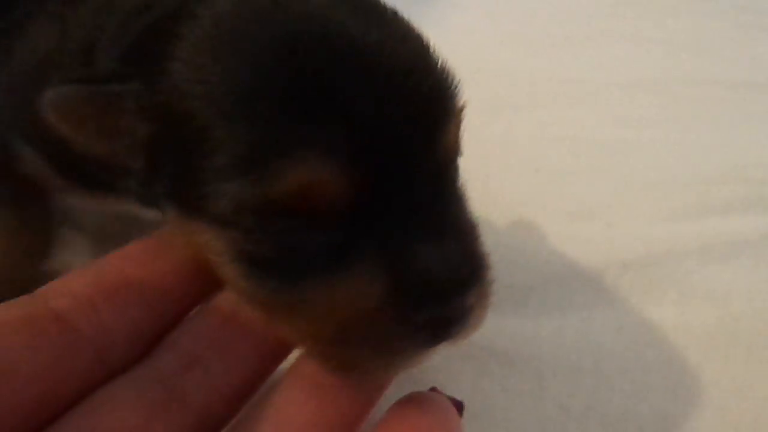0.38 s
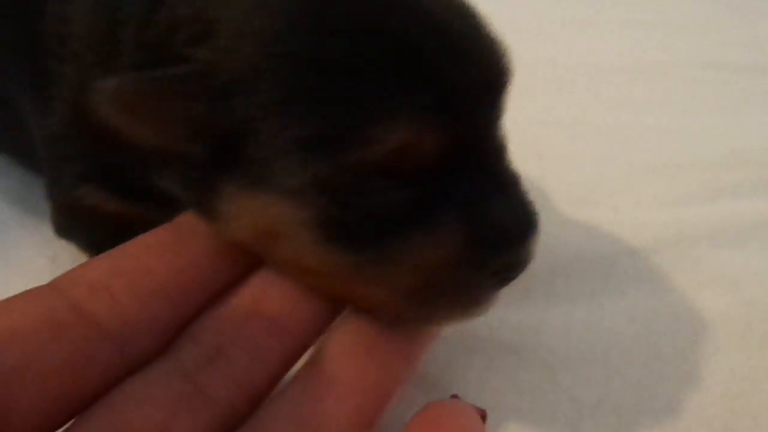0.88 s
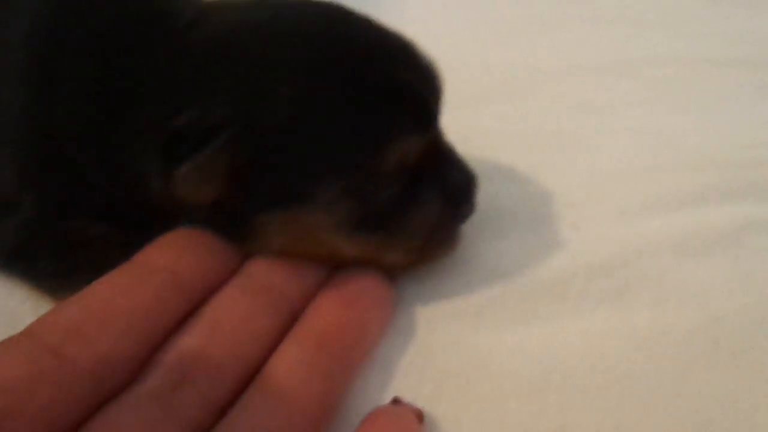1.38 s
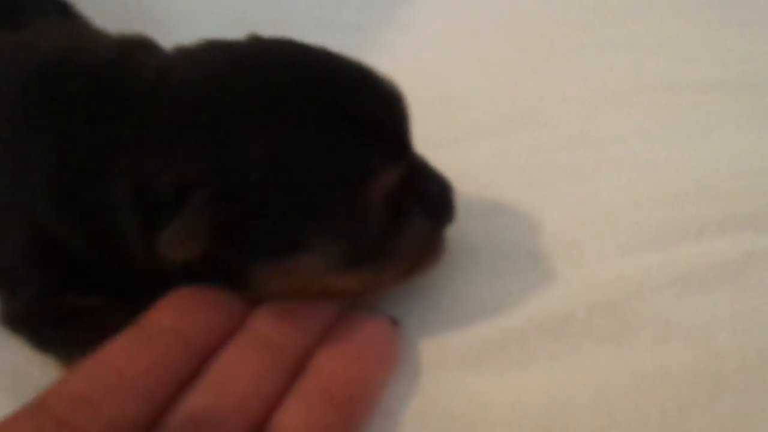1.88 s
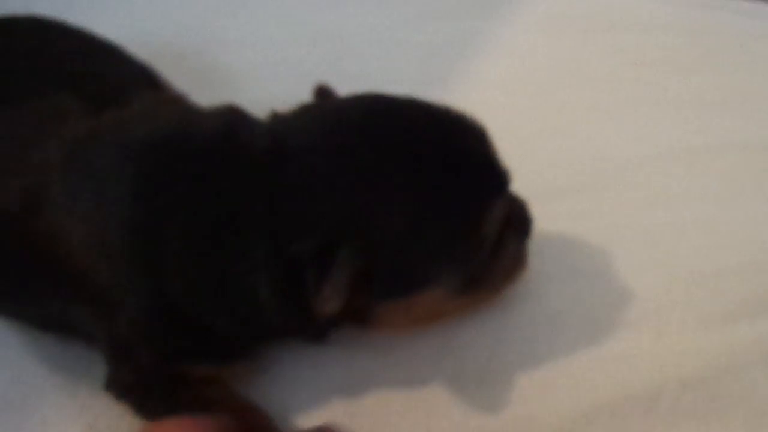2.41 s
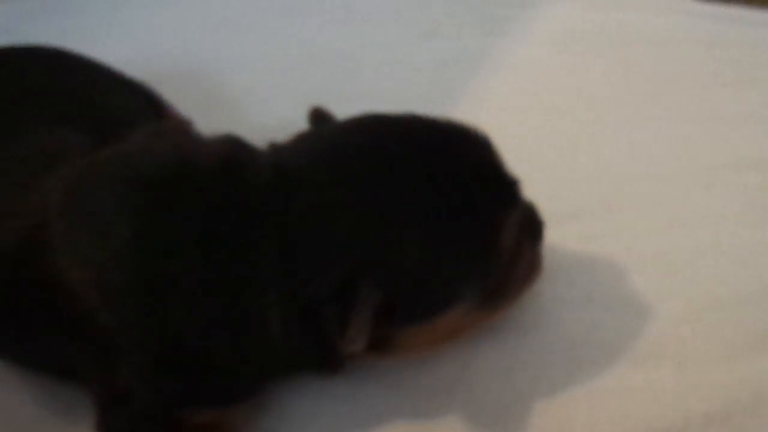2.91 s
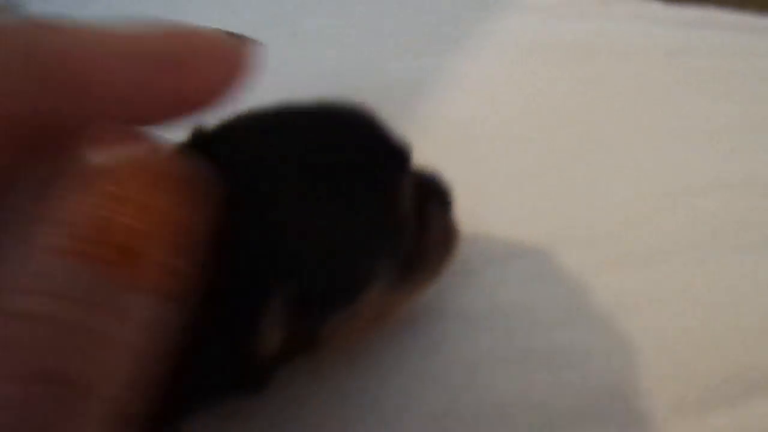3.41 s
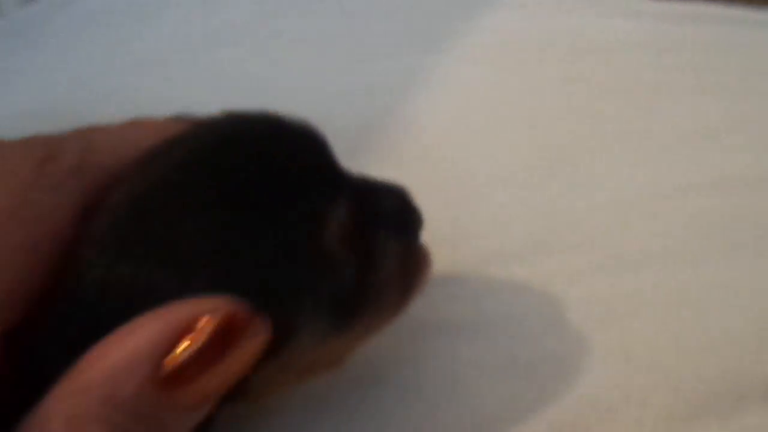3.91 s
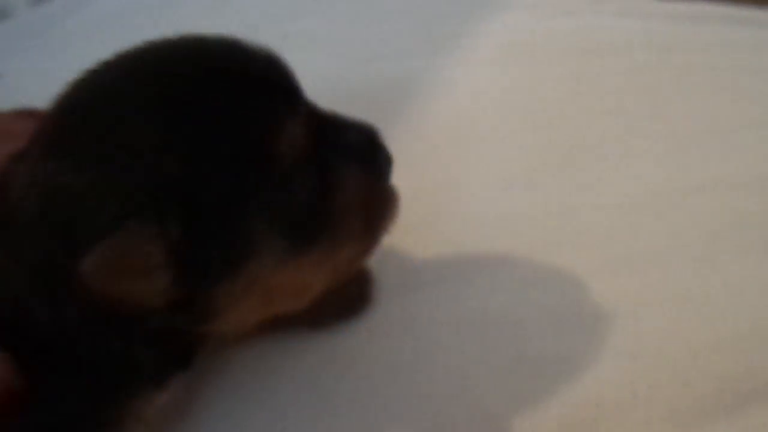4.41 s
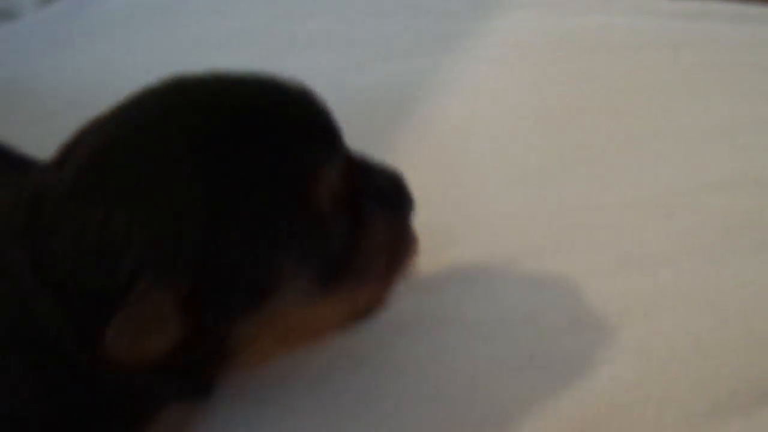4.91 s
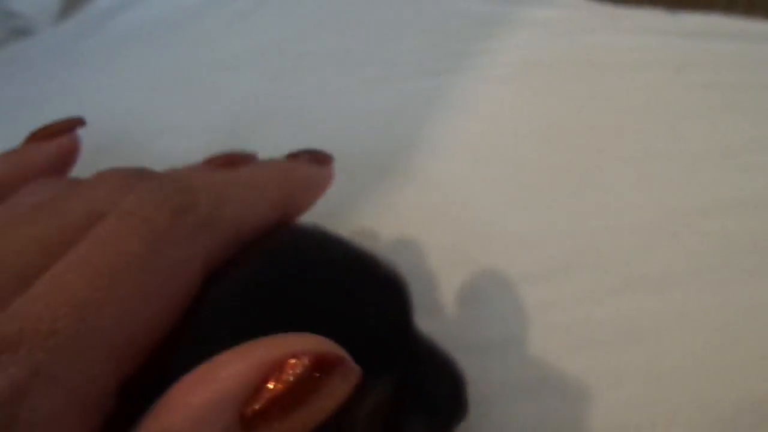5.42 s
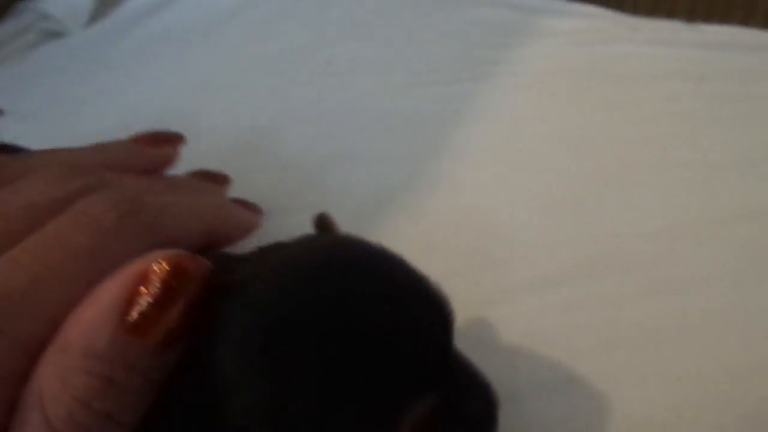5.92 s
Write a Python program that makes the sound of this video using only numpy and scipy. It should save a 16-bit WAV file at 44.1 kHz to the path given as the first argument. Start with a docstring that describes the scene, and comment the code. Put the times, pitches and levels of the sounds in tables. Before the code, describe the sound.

Close view of a tiny puppy fussing on bedding: high squeaks crack into low, pulsing creaks, each well under half a second. The first is the loudest and highest, the middle ones weaker and grainier, and a last strong whimper comes near the end. Small mouth clicks, breathy sniffs and a rustly snuffle lie between. Soft thuds repeat far off; dry indoor air, constant hiss and a very thin electronic whine.

```python
"""A quiet room, a bed close to the microphone: a newborn puppy whimpers in squeaks that break into creaky pulses.
The voice is a train of uneven fold pulses through a shut and an open mouth, with a faint, dull room tail.
Shaped noise makes the nose air and low puffs of breath, dense grains the snuffles, ringing snaps the lip clicks.
Further off, dull thuds fall about every 0.6 s as dying bands of noise.
Steady coloured hiss and a thin, sign-flipping whine lie below."""
import sys
import numpy as np
from scipy import signal
from scipy.fft import rfft, irfft
from scipy.io import wavfile
from scipy.ndimage import uniform_filter1d

SR = 44100
rng = np.random.default_rng(int(sys.argv[2]) if len(sys.argv) > 2 else 0)


def voltage_ratio(level):
    """Linear amplitude factor for a level in decibels (scalar or array-like)."""
    return 10 ** (np.asarray(level, float) / 20)


def wrap_up_sound(samples):
    """Save the sound to the file named by the first command line argument, as 16-bit audio."""
    columns = np.atleast_2d(samples).T
    # keep every value between -1 and 1, then stretch to whole-number steps
    tamed = np.clip(columns, -1, 1)
    steps = np.round(tamed * 32767).astype(np.int16)
    wavfile.write(sys.argv[1], SR, steps)


N = 266917  # samples

# colour of the room hiss: (frequency [Hz], level per Hz [dB])
ROOM_COLOUR = [(15, -45), (25, -13.5), (64, -13), (109, -4.5), (242, -4.5), (460, -3.5), (511, -3.5),
               (763, -1.5), (896, -2), (1110, -4), (1370, -3.5), (1610, -6), (10700, -14), (12000, -12),
               (14800, -12.5)]
ROOM_DB = -57.5
# thin electronic whine: (tone [Hz], rate of the full sign cycle, two flips each [Hz])
WHINE = (12272.7, 14.985)

# lip clicks: (time [s], peak [dB], ring [Hz], bright edge [dB])
CLICKS = [(0.211, -37, 1560, -13), (1.029, -40, 1230, -16), (1.088, -48, 834, -16), (1.258, -37, 1120, -13),
          (1.905, -44, 860, -21), (1.929, -39, 1250, -23), (2.404, -38, 745, -21),
          (2.436, -42.5, 1460, -18), (2.794, -38, 770, -20), (3.151, -46, 1250, 7), (4.56, -50, 826, -16),
          (5.435, -37.5, 760, -26), (5.454, -42, 1200, -19), (5.751, -31, 769, -4)]

FADE_DB = 20  # depth reached after one rise or release time
# air hissing through the nostrils: (time [s], rise [s], hold [s], level [dB])
NOSE_AIR = [(.38, .06, .022, -65), (0.666, 0.035, .012, -62), (1.25, .022, 0.011, -71),
            (1.33, 0.12, .19, -60), (1.98, .08, .086, -65), (2.48, .04, 0.15, -72.5),
            (3.3, 0.12, .17, -67.5), (3.704, 0.13, 0.091, -55.5), (5.13, .052, .008, -60.5),
            (5.452, 0.11, 0.19, -59.5)]
AIR_SAG_DB_PER_S, AIR_RELEASE_S = 8, .04
# nostril resonances: (frequency [Hz], width [Hz], level [dB])
NOSE_RESONANCES = [(9860, 990, 12), (11450, 1800, 4.5), (14000, 3100, 1.5)]
# one whistle in the nose, level before its wobble: (time [s], rise [s], hold [s], level [dB])
NOSE_WHISTLE = (3.464, .006, .025, -60)
WHISTLE_START_HZ, WHISTLE_SAG_HZ_PER_S, WHISTLE_RELEASE_S = 6080, 1200, .14

# snuffles in the sheet: (time [s], rise [s], hold [s], level of the low part [dB], treble against it [dB])
SNUFFLES = [(.42, .006, .06, -61, -4), (2.793, .004, .136, -48, -4), (3.147, 0.0039, 0.032, -42.5, -1.5),
            (3.165, 0.026, 0.019, -38, -2.5), (3.21, 0.023, 0.12, -44.5, -2.5),
            (3.483, 0.0073, 0.018, -53.5, 1.5), (3.524, 0.018, 0.11, -63, 5),
            (4.523, .004, .012, -51, -1.5)]
SNUFFLE_SAG_DB_PER_S, SNUFFLE_RELEASE_S = 70, .027
# nasal low part of a snuffle: (frequency [Hz], width [Hz], level [dB])
SNUFFLE_RESONANCES = [(900, 230, -1), (1680, 2720, -7.5)]

# one entry a cry: (mouth opening at rest [0-1], added gape on high notes [0-1], basic fold slackness [0-1]),
# then rows of (time [s], vocal fold rate [Hz], level [dB], roughness before a small cut [0-1])
CRIES = [ ((0.33, 0.58, .14), [(.51, 1000, -39.5, 0.01), (.536, 1112, -37, 0.14), (.539, 1209, -24, 0.08),
         (.56, 1368, -22.5, 0.06), (.577, 1445, -23, 0.06), (.59, 1475, -27, 0.01),
         (.607, 1364, -27.5, 0.06), (.625, 1258, -31.5, 0.06), (.641, 1028, -36, 0), (.657, 669, -36, 0.04),
         (.665, 616, -36.5, 0.08), (.678, 640, -35.5, 0.04), (.697, 563, -30.5, 0.02),
         (.705, 540, -31.5, 0.41), (.721, 496.4, -37, 0.35), (.737, 390, -36, 0.14), (.753, 460, -39, .55),
         (.785, 330.5, -41, .28), (.801, 295.6, -40, .22), (.811, 288, -53, 0)]), ((.1, 0, .15),
         [(.859, 790, -50.5, 0.67), (.866, 850, -41, 0.43), (.873, 900, -52, .55)]), ((0.33, .1, 0),
         [(.981, 1104, -51, 0.03), (.995, 1180, -58, .25), (1.024, 1165, -54, 0.07)]), ((0.26, 0.27, 0.017),
         [(1.262, 605, -45, 0.28), (1.271, 571, -35.5, 0), (1.283, 538, -33.5, 0.06),
         (1.292, 620, -36.5, 0.08), (1.303, 766, -28, 0), (1.319, 788, -28.5, .03), (1.343, 933, -31, 0.07),
         (1.361, 1022, -32.5, 0.05), (1.375, 959.4, -32, 0.09), (1.394, 698, -31.5, 0.05),
         (1.409, 715, -28.5, 0.1), (1.423, 555, -25.5, 0.15), (1.433, 500, -30, 0.42),
         (1.471, 680, -26.5, 0.71), (1.492, 441.7, -32, 0.33), (1.502, 780, -27.5, 0.61),
         (1.53, 594, -32.5, .7), (1.545, 551, -27.5, .5), (1.57, 652, -32, .7), (1.605, 452, -35.5, .62),
         (1.625, 406, -41.5, .5)]), ((0.22, .1, 0.19), [(1.938, 1902, -53, 0.01),
         (1.949, 1319, -39.5, 0.04), (1.953, 669.4, -42, 0.39), (1.966, 403.3, -43, .45),
         (1.984, 699, -34, 0.63), (1.992, 595.4, -40, 0.61), (2.0, 1800, -54, 0.01),
         (2.005, 1250, -34, .12), (2.01, 423, -43, .11), (2.022, 445, -36.5, 0.2),
         (2.047, 620, -33.5, 0.76), (2.06, 700, -34.5, 0.59), (2.074, 428, -33.5, .27),
         (2.091, 500, -32.5, .5), (2.112, 500, -35.5, 0.69), (2.127, 570, -44, .2)]), ((0.23, .1, 0.24),
         [(2.449, 406.6, -53, 0.58), (2.464, 580, -43, 0.28), (2.484, 405.2, -38, 0.72),
         (2.5, 398, -55, .7), (2.514, 388, -42, 0.59), (2.552, 590.4, -41.5, 0.73), (2.572, 606, -35.5, .6),
         (2.58, 373, -38.5, 0.17), (2.592, 325, -38.5, 0.03), (2.606, 346, -38.5, 0),
         (2.611, 630, -43, 0.2), (2.62, 614, -55, 0.3)]), ((0.33, .1, .4), [(2.96, 500, -45.5, .5),
         (2.975, 403.6, -48.5, 0.47), (2.99, 398, -49, 0.62), (3.003, 318, -38.5, 0.36),
         (3.019, 399.7, -42.5, 0.52), (3.052, 405, -38, 0.49), (3.058, 600, -41.5, 0.17),
         (3.064, 607, -46, 0.08)]), ((0.4, .1, 0.57), [(3.332, 664, -50, 0.48), (3.346, 639, -40.5, 0.23),
         (3.36, 666, -34, 0.04), (3.376, 611, -39.5, 0), (3.38, 402, -39, 0.58), (3.4, 480, -37, 0.67),
         (3.417, 433, -34.5, 0.23), (3.426, 423, -35.5, .08), (3.442, 349, -37, 0.02),
         (3.455, 301, -43, .4), (3.464, 334, -37.5, 0.47), (3.472, 420, -42.5, 0.33),
         (3.481, 604, -42, .2)]), ((0.22, .1, 0.26), [(3.704, 536.2, -44.5, 0.21),
         (3.732, 521.4, -38, 0.73), (3.748, 481.4, -35, 0.26), (3.79, 576, -35, 0.59),
         (3.804, 461, -39, 0.54), (3.82, 566.4, -32, 0.51), (3.86, 545, -35, 0.58), (3.878, 686, -33, 0.64),
         (3.886, 600, -39.5, 0.58), (3.898, 500, -45, 0.33)]), ((.1, 0, .1), [(4.472, 1153, -54, 0.32),
         (4.49, 1250, -61.5, 0.43), (4.53, 1150, -53.5, 0.28), (4.55, 1100, -57, 0.26)]), ((.1, 0, .1),
         [(4.81, 1300, -63, .3), (4.845, 1300, -59, 0.18), (4.857, 1280, -59, 0.16)]), ((0.12, .1, 0.13),
         [(5.088, 1150, -53, .3), (5.104, 950, -50, 0.28), (5.124, 500, -51, 0.81), (5.17, 679, -44.5, .65),
         (5.182, 500, -62, .6)]), ((.14, 0.45, .07), [(5.462, 276, -46, 0.39), (5.472, 415, -39.5, 0.18),
         (5.492, 656.4, -30.5, 0.09), (5.503, 638, -28.5, 0.09), (5.524, 687, -28.5, 0.04),
         (5.534, 738.5, -26, 0.09), (5.547, 665.4, -25.5, 0.05), (5.553, 427.6, -31, 0.27),
         (5.57, 376, -26.5, 0.02), (5.582, 370.3, -29, 0.17), (5.592, 620, -25.5, 0.57),
         (5.604, 620, -31.5, 0.64), (5.624, 601.6, -30, 0.62), (5.657, 620, -30, 0.84),
         (5.716, 620, -32.5, 0.66), (5.73, 620, -35, .65), (5.742, 620, -45, 0.63)]), ((0.17, 0, 0.076),
         [(6.013, 129.5, -47.5, 0.16), (6.036, 500, -60, 0.74), (6.052, 620, -41.5, 0.68)]), ]
# moments in another, steady register: (time [s], length [s], rate [Hz], level at mid-flip [dB])
FLIPS = [(1.967, .01, 1300, -47), (2.024, .019, 1219, -28.5), (2.062, .009, 1250, -27),
         (2.47, .01, 1111, -40), (2.502, .009, 1800, -55), (2.535, .013, 1119, -36),
         (2.566, .004, 1153, -34), (3.035, .011, 1090, -46.5), (3.406, .007, 1090, -48),
         (3.825, .012, 1153, -28.5), (5.505, .011, 309, -29), (5.632, .013, 508, -29)]
FLIP_ROUGHNESS, FLIP_GAPE, FLIP_SLACK = .074, .03, .25
FLIP_EDGE_DB = -3.5  # a flip swells and shrinks again
# the voice catches: (time [s], length [s])
CATCHES = [(1.977, .004), (1.991, .007), (2.093, .003), (2.12, .004), (2.478, .004), (2.509, .004),
           (2.56, .003), (3.412, .003), (3.455, .005), (3.477, .004), (3.727, .003), (3.792, .003),
           (5.719, .005)]
CATCH_DB = -21.5
GAPE_FROM_HZ, GAPE_FULL_HZ = 590, 1150  # the mouth opens as the pitch climbs
CLOSING_S, CLOSING_SLACK = .024, .41  # the folds go limp as a cry ends
# folds slacken when faint, and close softly on high notes
SLACK_PER_DB, SLACK_BELOW_DB, SLACK_ON_TOP = .1, -34, .33
# throat resonances, mouth shut: (frequency [Hz], width [Hz], level [dB])
SHUT_MOUTH = [(620, 477, -2), (1300, 414, 7.5), (1824, 250, 3.5), (2868, 370, -4), (3415, 570, -12.5)]
# throat resonances, mouth open: (frequency [Hz], width [Hz], level [dB])
OPEN_MOUTH = [(1100, 530, 0.02), (2420, 884, 0.0063), (2864, 408, 1.44)]
# overtones let out by the wide open mouth: (frequency [Hz], width [Hz], level [dB])
HIGH_OVERTONES = [(5830, 1900, -43.5), (10200, 1000, -40), (13800, 2200, -43)]
NASAL_DIP_HZ = 2200
BEDROOM_T60_S, BEDROOM_DB = .35, -27

# low puffs of breath on the microphone: (time [s], rise [s], hold [s], level [dB])
PUFFS = [(1.47, 0.06, .09, -67), (1.7, 0.086, 0.021, -72), (3.766, 0.054, .01, -70),
         (5.78, 0.049, .04, -66), (5.92, .048, .01, -78)]
PUFF_SAG_DB_PER_S, PUFF_RELEASE_S = 10, .09

# far thuds: (time [s], level [dB], boom below 150 Hz [dB], knock above 400 Hz [dB])
THUDS = [(2.715, -43, -1, -3.5), (3.177, -48.5, 3.5, 10), (3.92, -49.5, -1.5, 5.5), (4.525, -51, 1, 2.5),
         (5.137, -49, -4, 0.5), (5.746, -45, 1.5, 3.5)]
# how the thuds die away: (band centre [Hz], level [dB], decay by 60 dB [s])
THUD_BANDS = [(106, -11.5, 0.69), (221, -5.5, 0.69), (500, -12.5, 1), (1000, -14, 0.66),
              (1800, -16.5, 0.98)]
OFFSET = -.00055  # constant shift of the waveform [full scale]


def rms_one(x):
    """Scales to unit power."""
    return x / np.sqrt(np.mean(x ** 2) + 1e-20)


def band(x, low_hz, high_hz, order=2):
    """Butterworth band-pass."""
    edges = [low_hz, min(high_hz, .45 * SR)]
    return signal.sosfilt(signal.butter(order, edges, "band", fs=SR, output="sos"), x)


def resonate(x, modes):
    """Parallel resonances, signs alternating."""
    out = 0
    for k, (hz, width_hz, db) in enumerate(modes):
        radius = np.exp(-np.pi * width_hz / SR)
        b = np.array([1, 0, -1]) * (1 - radius * radius) / 2
        a = [1, -2 * radius * np.cos(2 * np.pi * hz / SR), radius * radius]
        out = out + (-1) ** k * voltage_ratio(db) * signal.lfilter(b, a, x + 1e-18)
    return out


def pulses(times, sizes):
    """Band-limited clicks that may fall between samples."""
    at = np.asarray(times) * SR
    index = at.astype(int)[:, None] + np.arange(-7, 9)
    lag = index - at[:, None]
    click = np.sinc(.8 * lag) * np.cos(np.pi * lag / 16) ** 2
    out = np.zeros(N + 4000)
    np.add.at(out, index, np.asarray(sizes)[:, None] * click)
    return out[:N]


def swell(s, rise_s, hold_s, db, sag_db_per_s, release_s):
    """Gain that rises, holds while sagging, then lets go."""
    since = np.arange(N) / SR - s - rise_s
    edge = np.maximum(-since / rise_s, (since - hold_s) / release_s).clip(0)
    fall_db = FADE_DB * edge + sag_db_per_s * since.clip(0)
    return voltage_ratio(db - np.minimum(fall_db, 150)) * (since > -rise_s)


def room_hiss():
    """Steady noise with the colour of room and preamplifier together."""
    hz = np.arange(N // 2 + 1) * SR / N + 1
    colour_hz, colour_db = np.transpose(ROOM_COLOUR)
    colour = voltage_ratio(np.interp(np.log(hz), np.log(colour_hz), colour_db))
    return voltage_ratio(ROOM_DB) * rms_one(irfft(rfft(rng.standard_normal(N)) * colour, N))


def whine(db, first_flip_s):
    """A thin tone from the electronics that changes sign thirty times a second."""
    t = np.arange(N) / SR
    hz, flips_hz = WHINE
    sign = np.tanh(5.4 * np.sin(2 * np.pi * flips_hz * (t - first_flip_s)))
    return np.sqrt(2) * voltage_ratio(db) * sign * np.sin(2 * np.pi * hz * t)


def clicks():
    """Wet lips part: a snap that rings for a cycle or two."""
    out = 0
    for s, db, hz, edge_db in CLICKS:
        pop = pulses([s], [1])
        ring = resonate(resonate(pop, [(hz, 1100, 0)]), [(hz, 1100, 0)])
        edge = band(resonate(pop, [(2870, 1000, edge_db)]), 1600, 3700)
        snap = ring + edge
        out = out + voltage_ratio(db) * snap / np.abs(snap).max()
    return out


def nose_air(voice, flutter):
    """Turbulent air, throbbing a little with the voice, and one short whistle."""
    level = sum(swell(*row, AIR_SAG_DB_PER_S, AIR_RELEASE_S) for row in NOSE_AIR)
    throb = np.abs(voice) / np.sqrt(uniform_filter1d(voice ** 2, size=900).clip(0) + 1e-6)
    hiss = rms_one(resonate(rng.standard_normal(N), NOSE_RESONANCES))
    hiss = hiss * (1 + flutter * uniform_filter1d(throb, size=40))
    since = np.arange(N) / SR - NOSE_WHISTLE[0]
    wobble = .64 + .54 * rms_one(band(rng.standard_normal(N), 24, 200))
    # halving the sag in the phase makes the pitch fall at the full rate
    turns = (WHISTLE_START_HZ - WHISTLE_SAG_HZ_PER_S * since / 2) * since
    whistle = np.sqrt(2) * wobble * np.sin(2 * np.pi * turns)
    return level * hiss + swell(*NOSE_WHISTLE, 0, WHISTLE_RELEASE_S) * whistle


def snuffles(grains_per_s, spread_db):
    """Dense uneven grains of air and cloth: a nasal low part and a broad hiss."""
    falls = rng.random(N) < grains_per_s / SR
    sizes = voltage_ratio(spread_db * np.minimum(rng.exponential(1, N), 4))
    grains = falls * sizes * rng.choice([-1, 1], N)
    low = rms_one(resonate(grains, SNUFFLE_RESONANCES))
    treble = rms_one(band(grains, 1750, 5800, order=1))
    out = 0
    for *row, treble_db in SNUFFLES:
        gain = swell(*row, SNUFFLE_SAG_DB_PER_S, SNUFFLE_RELEASE_S)
        out = out + gain * (low + voltage_ratio(treble_db) * treble)
    return out


def folds_at(t, cry):
    """Rate, level, roughness, mouth opening and slackness of one cry at one moment."""
    (rest, gape, slack), table = cry
    s, *columns = np.transpose(table)
    hz, db, rough = (np.interp(t, s, column) for column in columns)
    slack = slack + SLACK_PER_DB * max(SLACK_BELOW_DB - db, 0)
    slack = slack + CLOSING_SLACK * np.exp((t - s[-1]) / CLOSING_S)
    for start, length, flip_hz, flip_db in FLIPS:
        if start <= t < start + length:
            hz = flip_hz
            db = flip_db + FLIP_EDGE_DB * (2 * (t - start) / length - 1) ** 2
            rough, gape, slack = FLIP_ROUGHNESS, FLIP_GAPE, FLIP_SLACK
    db += CATCH_DB * any(start <= t < start + length for start, length in CATCHES)
    high = np.clip((hz - GAPE_FROM_HZ) / (GAPE_FULL_HZ - GAPE_FROM_HZ), 0, 1)
    return hz, db, np.clip(rough - .05, 0, 1), rest + gape * high, slack + SLACK_ON_TOP * high


def throat(times, sizes, opening, slack, turbulence):
    """Each pulse is shared between the shut and the open mouth; slack folds close softly and sound dull."""
    air = rng.standard_normal(N)

    def gusts(share):
        """A short burst of rushing air follows every rough pulse."""
        return air * signal.lfilter([1], [1, -.985], pulses(times, sizes * share * turbulence))

    def folds(share):
        """Firm closures, dull soft closures and gusts of one share of the pulses."""
        firm = pulses(times, sizes * share * (1 - slack))
        soft = band(pulses(times, sizes * share * slack), 87, 884)
        return firm + 1.94 * soft + gusts(share * (1 - slack))

    nasal_dip = signal.iirnotch(NASAL_DIP_HZ, 3.0, fs=SR)
    shut = signal.lfilter(*nasal_dip, resonate(folds(1 - opening), SHUT_MOUTH))
    shut = band(band(shut, 250, 6000), 120, 3850, order=3)
    wide = band(resonate(folds(opening), OPEN_MOUTH), 570, 4080, order=3)
    rasp = band(gusts(1 - slack), 3500, 4600, order=4)
    # the cube favours the wide open mouth
    bright = band(pulses(times, sizes * opening ** 3), 5000, 15000)
    return shut + wide + voltage_ratio(-17.5) * rasp + resonate(bright, HIGH_OVERTONES)


def cries(jitter, memory, shimmer_db, breathy):
    """The folds close cycle after cycle; roughness makes the cycles uneven in length and strength."""
    rows = []
    for cry in CRIES:
        table = cry[1]
        t, end = table[0][0], min(table[-1][0], N / SR)
        lengths, strengths = rng.standard_normal((500, 2)).T
        # a long cycle tends to follow a long one
        lengths = signal.lfilter([np.sqrt(1 - memory ** 2)], [1, -memory], lengths)
        for length, strength in zip(lengths, strengths):
            if t > end:
                break
            hz, db, rough, opening, slack = folds_at(t, cry)
            pulse_db = db + shimmer_db * rough * np.clip(strength, -2, .5)
            rows.append((t, pulse_db, opening, slack, breathy * rough))
            t += np.exp(np.clip(jitter * rough * length, -1, .7)) / hz
    times, db, *shape = np.transpose(rows)
    shape = np.clip(shape, 0, 1)
    # the effort sets the loudness whatever the pitch: equal pulses show what the throat adds
    even = throat(times, np.ones_like(times), *shape)
    power = uniform_filter1d(uniform_filter1d(even ** 2, size=200), size=200)
    loudness = np.sqrt(power.clip(0) + 1e-9)
    near = np.minimum((times * SR).astype(int) + 40, N - 1)
    return throat(times, voltage_ratio(db) / loudness[near], *shape)


def bedroom(x):
    """Soft furnishings return a faint, dull tail."""
    t = np.arange(SR // 2) / SR
    noise = band(rng.standard_normal(len(t)), 480, 2400)
    tail = noise * voltage_ratio(-60 * t / BEDROOM_T60_S) * (t > .004)
    return voltage_ratio(BEDROOM_DB) * signal.fftconvolve(x, tail / np.sqrt(np.sum(tail ** 2)))[:N]


def puffs():
    """The puppy's breath pushes slow, low puffs of air against the microphone."""
    level = sum(swell(*row, PUFF_SAG_DB_PER_S, PUFF_RELEASE_S) for row in PUFFS)
    return level * rms_one(band(rng.standard_normal(N), 30, 146))


def thuds():
    """Each thud reaches us as the room's tail, dying band by band."""
    out, t = np.zeros(N), np.arange(N) / SR
    for hz, band_db, t60 in THUD_BANDS:
        level = 0
        for s, db, boom_db, knock_db in THUDS:
            since = np.clip(t - s, 0, None)
            colour_db = boom_db * (hz < 150) + knock_db * (hz > 400)
            onset = 1 - np.exp(-since / .0011)
            level = level + voltage_ratio(db + colour_db - 60 * since / t60) * onset
        noise = rms_one(band(rng.standard_normal(N), hz / 1.39, hz * 1.44))
        out += voltage_ratio(band_db) * level * noise
    return out


def scene():
    """One microphone feeds both channels."""
    voice = cries(jitter=.7, memory=.45, shimmer_db=6, breathy=.083)
    floor = room_hiss() + whine(db=-64.5, first_flip_s=.0122)
    puppy = clicks() + nose_air(voice, flutter=.88) + snuffles(grains_per_s=3000, spread_db=1.5) + voice
    heard = floor + puppy + bedroom(voice) + puffs() + thuds()
    return np.stack([heard, heard])


def band_limit(x):
    """A steep low-pass at the top of the band."""
    return signal.sosfilt(signal.butter(12, 15310, fs=SR, output="sos"), x)


def record(dry):
    """A steep low-pass cuts the top and a small constant offset is added."""
    cut = signal.cheby2(14, 60, 15450, fs=SR, output="sos")
    mix = signal.sosfilt(cut, dry) + OFFSET
    return band_limit(mix)


dry = scene()
out = record(dry)
wrap_up_sound(out)
```